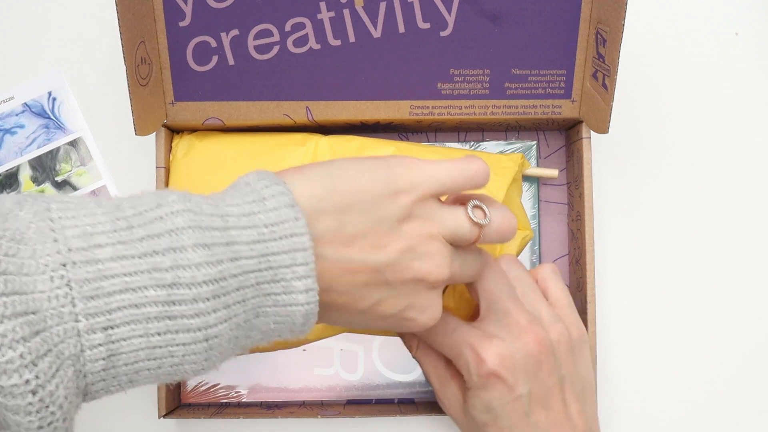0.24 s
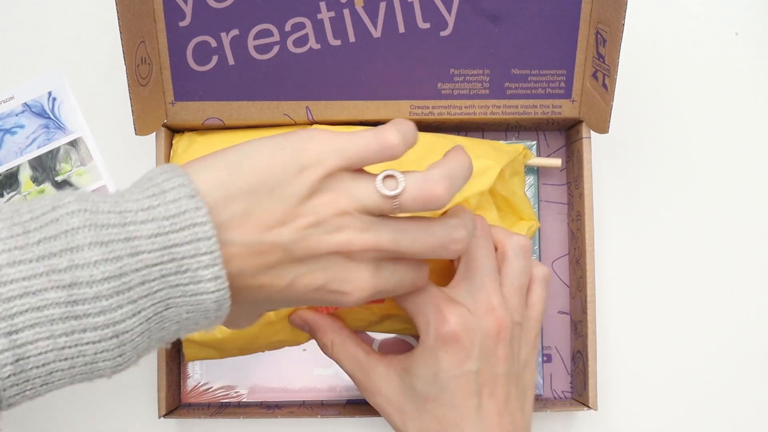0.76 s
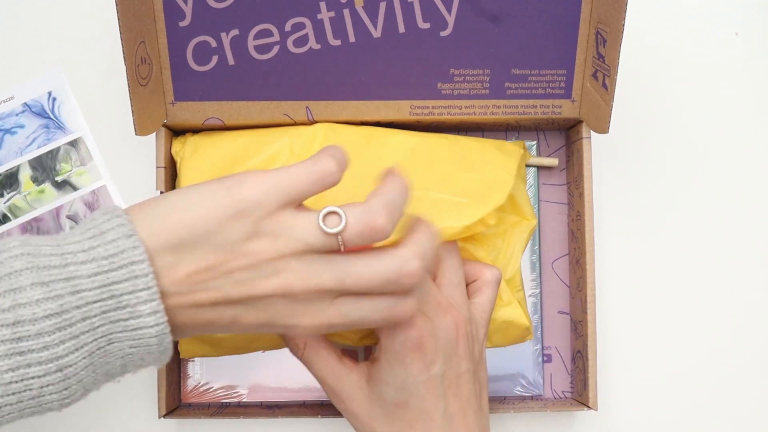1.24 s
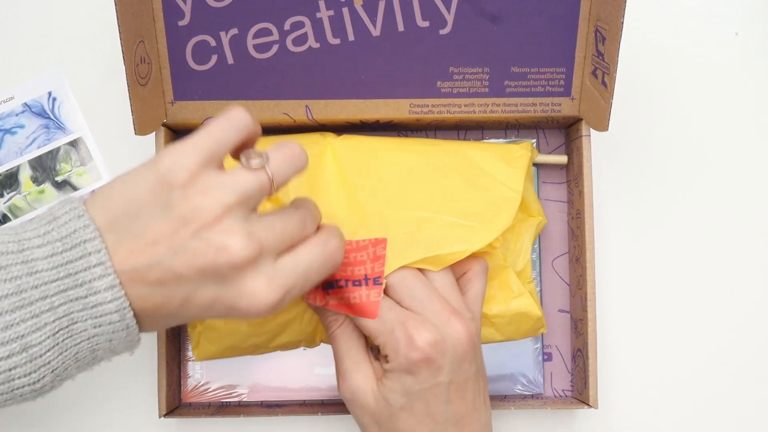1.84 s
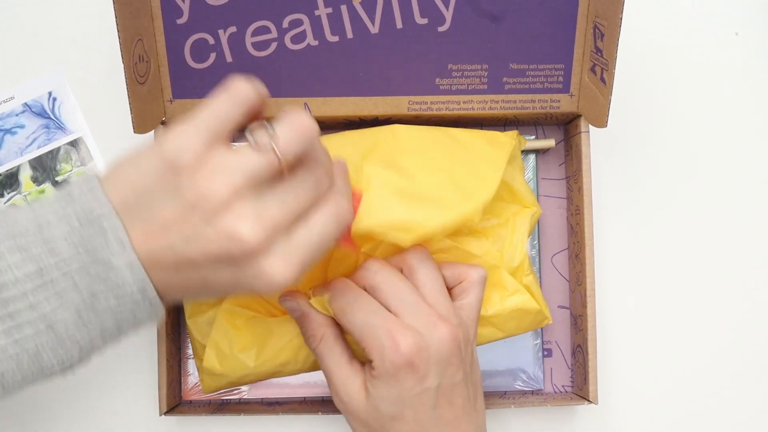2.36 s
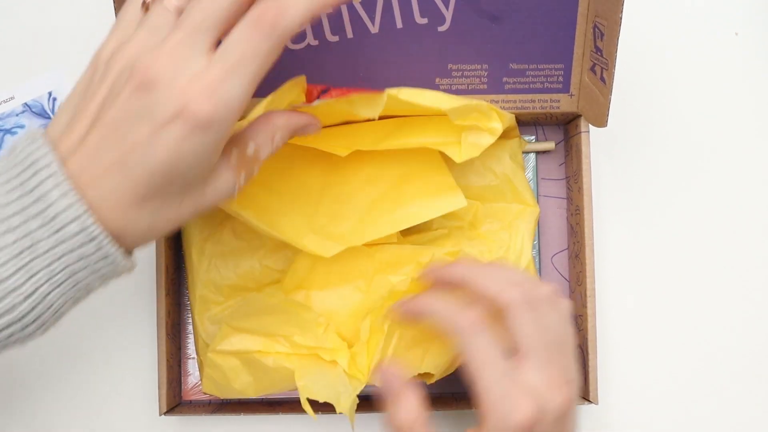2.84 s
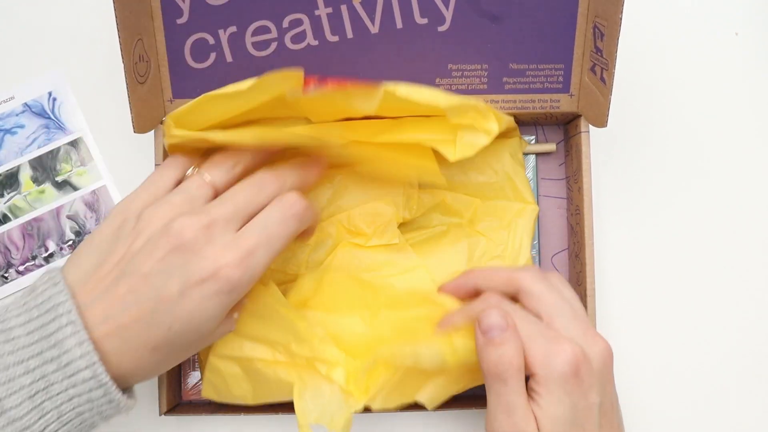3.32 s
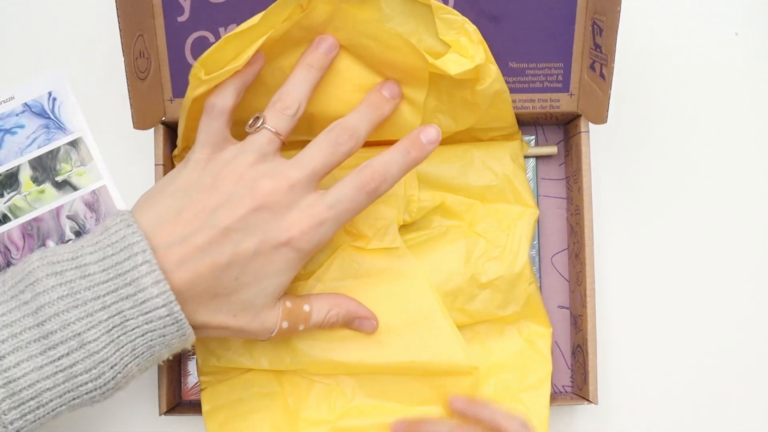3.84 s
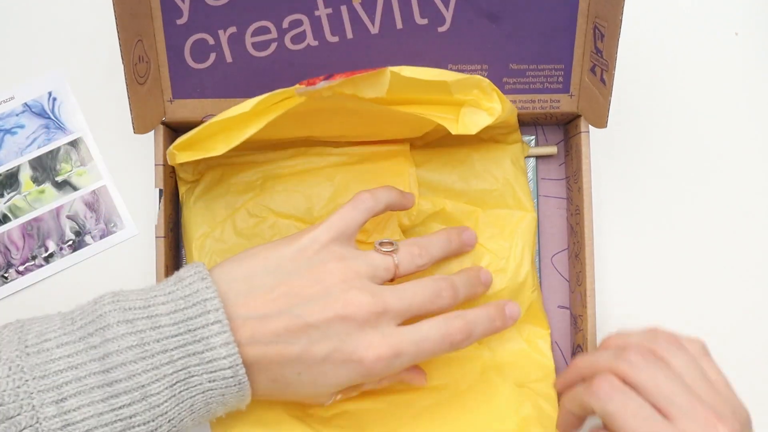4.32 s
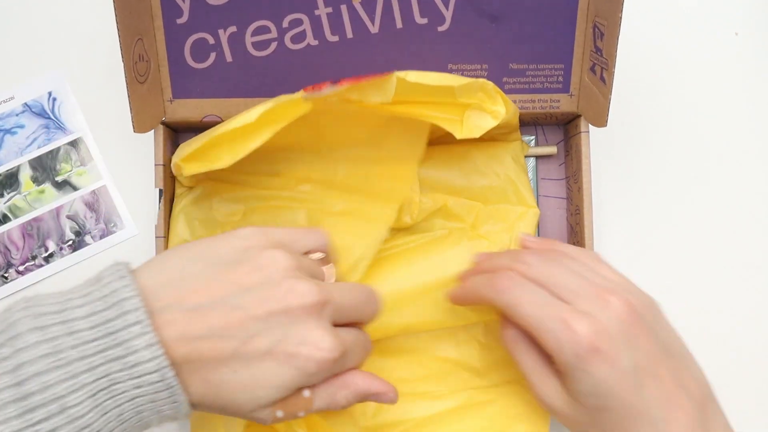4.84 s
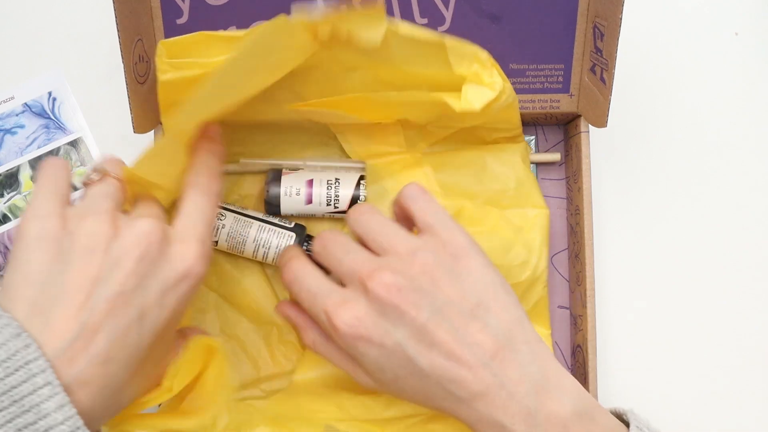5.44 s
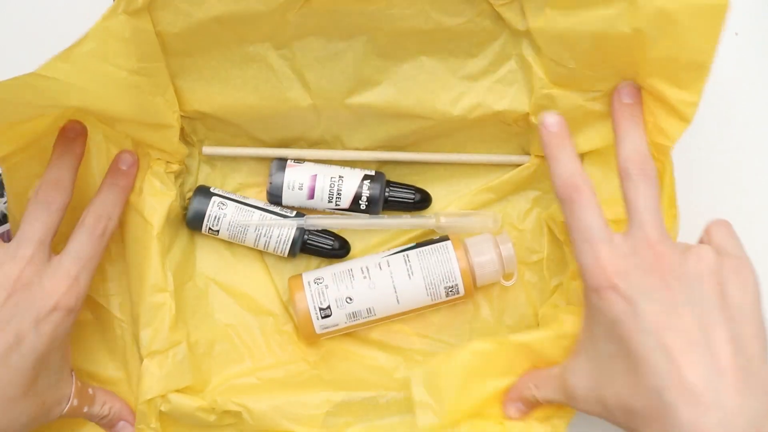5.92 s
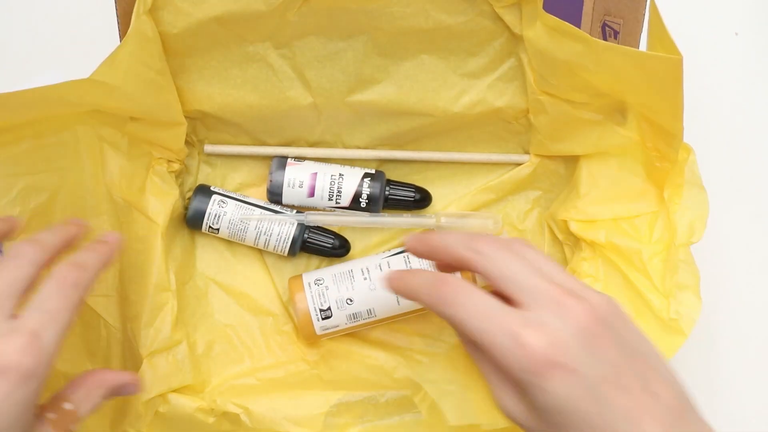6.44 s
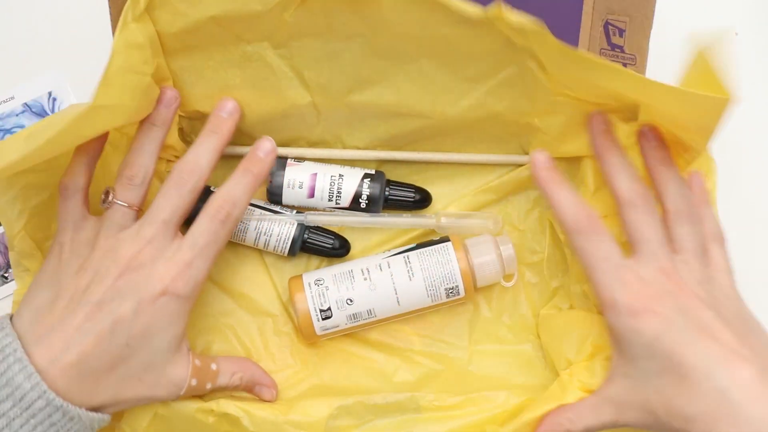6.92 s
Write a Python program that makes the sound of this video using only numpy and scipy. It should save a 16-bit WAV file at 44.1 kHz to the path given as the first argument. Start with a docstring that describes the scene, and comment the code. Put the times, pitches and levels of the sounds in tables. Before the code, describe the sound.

Dry, bright tissue paper heard very close in stereo, with little room echo. Short bursts of crinkling start strongly, shrink to small creases and picking, and nearly stop around three seconds. Hoarse palm sweeps and moderate rustles follow, then another hush. The longest, fullest unfolding comes after five seconds, a quiet gap follows, and the paper is pressed flat with a last sharp snap.

```python
"""Tissue paper rustles as hands peel a sticker off a parcel, fold the sheets open and smooth them down.
The rustle is thousands of tiny random clicks, the sheet's buckles, with louder snaps, crumples and soft flops.
The cardboard box rings along through its resonances, rumbles as filtered noise and takes a few soft bumps.
Sliding palms and pushed-out air are bands of noise. Two close microphones hear it in a small quiet room.
Levels in the tables are relative: they set the balance inside each sound."""
import sys
import numpy as np
from scipy import signal
from scipy.fft import rfft, irfft, next_fast_len
from scipy.io import wavfile
from scipy.ndimage import uniform_filter1d, map_coordinates

SR = 44100
rng = np.random.default_rng(int(sys.argv[2]) if len(sys.argv) > 2 else 0)


def transcribe(u):
    """Save the signal u as a 16-bit wav file named by the first command-line argument.

    u: samples, shape (n,) or (channels, n), limited to [-1, 1]; the rate is SR.
    q: integer samples, one column per channel.
    """
    v = np.clip(np.atleast_2d(u).T, -1, 1)
    q = np.round(v * 32767).astype(np.int16)
    wavfile.write(sys.argv[1], SR, q)


N = 316197  # length [samples]


def amp(db):
    """Turn decibels into a plain gain."""
    return 10 ** (np.asarray(db) / 20)


def unit(x):
    """Scale to an rms of 1."""
    return x / np.sqrt(np.mean(x ** 2) + 1e-20)


def along(points, hz):
    """Read a (frequency, value) curve on a log frequency axis, as hearing spaces pitch."""
    f, v = np.transpose(points)
    return np.interp(np.log(hz + 1), np.log(f), v)


def curves(rows):
    """One value per sample for each column after the time."""
    s, *columns = np.transpose(rows)
    return [np.interp(np.arange(N) / SR, s, column) for column in columns]


def wobble(rate):
    """A smooth random curve, with this many random points a second."""
    knots = rng.standard_normal(int(N * rate / SR) + 4)
    return map_coordinates(knots, [np.arange(N) * rate / SR])


def grid():
    """The frequencies on which the long filters are drawn."""
    return np.fft.rfftfreq(2 * next_fast_len((N + SR // 2) // 2), 1 / SR)


def filtered(x, response):
    """Pass x through a response given on the grid."""
    m = 2 * (len(response) - 1)
    return irfft(rfft(x, m) * response, m)[..., :N]


def causal(gain):
    """The minimum-phase response with this gain: it rings only after a hit."""
    cepstrum = irfft(np.log(np.maximum(gain, 1e-6)))
    half = len(cepstrum) // 2
    cepstrum[1:half] *= 2
    cepstrum[half + 1:] = 0
    return np.exp(rfft(cepstrum))


def noise(spectrum):
    """Stereo noise of rms 1 with this spectrum."""
    return unit(filtered(rng.standard_normal((2, N)), amp(along(spectrum, grid()))))


def add(track, s, sound):
    """Mix a sound into a track at time s."""
    part = track[..., max(round(s * SR), 0):][..., :sound.shape[-1]]
    part += sound[..., :part.shape[-1]]


# Tone colour of the paper: (frequency [Hz], level per Hz [dB])
PAPER_COLOUR = [(100, -47), (190, -34.5), (250, -16.5), (320, -10.5), (600, -6.5), (700, -6.5), (870, -4),
                (1250, -7.5), (2200, -9), (2900, -9.5), (5500, -8.5), (7300, -7.5), (9000, -9), (11800, -7),
                (13200, -15.5), (15600, -29.5)]


def paper_gain(hz):
    """How strongly the paper sounds at each frequency."""
    return amp(along(PAPER_COLOUR, hz))


def tinted(x, hz, q):
    """A short paper sound through one broad resonance, scaled to energy 1 per channel."""
    m = 2 * x.shape[-1]
    f = np.fft.rfftfreq(m, 1 / SR)
    resonance = 1 / (1 + (q * (f / hz - hz / (f + 1))) ** 2)
    y = irfft(rfft(x, m) * causal(paper_gain(f) * resonance), m)
    return y / np.sqrt(np.sum(y ** 2) / len(y))


def buckles(rate, spread_db):
    """Tiny buckles of the sheet as random impulses of rms 1, many small and a few large."""
    size = amp(spread_db * np.minimum(rng.standard_normal(N), 2.3))
    happens = rng.random(N) < rate / SR
    return unit(happens * size * rng.choice([-1, 1], N))


def facet(lead_ms, ring_s, scatter_s, scatter_db):
    """Stereo pop of one patch of paper: a click and brief flutter, scattered by the folds around it."""
    t = np.arange(1024) / SR
    flutter = rng.standard_normal(len(t)) * amp(-60 * t / ring_s)
    click_and_flutter = flutter / np.linalg.norm(flutter) + (t == 0)
    click_and_flutter = np.roll(click_and_flutter, 16)
    # each patch gets its own direction: a small time lead at one microphone
    lead = (lead_ms + 0.054 * rng.standard_normal()) / 1000 * np.array([[1], [-1]])
    shift = np.exp(1j * np.pi * np.fft.rfftfreq(len(t), 1 / SR) * lead)
    direct = irfft(rfft(click_and_flutter) * shift)
    scatter = rng.standard_normal((2, len(t))) * amp(-60 * t / scatter_s) * np.sqrt(t)
    pop = direct / np.linalg.norm(direct[0]) + amp(scatter_db) * scatter / np.linalg.norm(scatter[0])
    return pop / np.linalg.norm(pop[0])


# Where the paper moves: (time [s], lead at the left microphone [ms])
PLACE = [(0, 0.052), (.6, 0.072), (1.2, -0.015), (3.5, 0.0099), (5.8, -0.025), (6.3, 0.066), (7.17, 0.013)]


def sheet(pulses, count=3, size=3000):
    """A few patches buckle at a time; new ones replace them after every `size` samples."""
    out, lead_ms = np.zeros((2, N)), curves(PLACE)[0]
    patch = rng.integers(count, size=N)
    for start in range(0, N, size):
        block = slice(start, start + size)
        for k in range(count):
            own = (pulses[block] * (patch[block] == k))[None]
            pop = facet(lead_ms[start], ring_s=.003, scatter_s=.019, scatter_db=-1)
            add(out, start / SR, signal.fftconvolve(own, pop, axes=1))
    return out


RELEASE_S = 0.12  # the paper settles by 20 dB in this time [s] when a hand stops


def swell(s, rise_s, hold_s):
    """Gain of one hand movement: it gathers 20 dB in the rise time, holds, then the paper settles."""
    t = np.arange(N) / SR - s
    away = np.maximum(-t / max(rise_s, .005), (t - hold_s) / RELEASE_S)
    return np.exp(-np.log(10) * np.clip(away, 0, 10))


# Light rustle while the hands rest on the sheet and shift: (time [s], level [dB])
CONTACT = [(0, -49.5), (0.3, -30.5), (0.66, -42.5), (1.2, -44.5), (1.75, -47), (2.35, -46.5), (2.6, -55),
           (2.88, -55.5), (3.14, -74.5), (3.24, -54), (3.9, -45.5), (4.06, -52.5), (4.22, -57), (4.49, -69),
           (4.72, -41), (6.03, -33.5), (6.22, -47.5), (6.5, -61.5), (6.66, -64), (6.85, -39)]
CONTACT_BODY_DB, CONTACT_SIZZLE_DB = -5, 0.5  # its low body and its sizzle, relative to it [dB]
# Tugs, lifts and sweeps, from picking at the sticker to pressing the sheets flat:
# (time of full speed [s], rise [s], hold [s], rustle level [dB],
#  low body relative to rustle [dB], sizzle relative to rustle [dB])
MOVES = [ (0.1, 0.18, 0.056, -32.5, 3, 3), (0.386, 0.035, 0.099, -28.5, 3.5, 3),
         (0.836, 0.058, 0.18, -38.5, -3, 1.5), (1.1, 0.12, 0.046, -34, -6, 1.5),
         (1.237, 0.06, 0.052, -28.5, -6, -1), (1.318, 0.069, 0.023, -40, 0, 4),
         (1.437, 0.046, 0.017, -45, -3, -3), (1.591, 0.19, 0.071, -38.5, -2.5, 0.5),
         (1.927, 0.051, 0.043, -48, 5, 8.5), (2.102, 0.086, 0.035, -32.5, -16, -8),
         (2.134, 0.059, 0.0075, -32, 5, 0), (2.32, 0.036, 0.019, -35, -5, -1),
         (2.388, 0.037, 0.027, -34, -5.5, 7), (2.801, 0.32, 0.015, -43.5, -4.5, -0.5),
         (3.172, 0.0081, 0.033, -48.5, -14, -12), (3.256, 0.043, 0.1, -38, 0.5, 3.5),
         (3.467, 0.06, 0.025, -44.5, 7, 5.5), (3.74, 0.28, 0.046, -37.5, -0.5, 0),
         (3.828, 0.026, 0.015, -34, -3.5, 3), (3.925, 0.083, 0.032, -36, -6.5, 4),
         (4.368, 0.005, 0.024, -53, -11, -3), (4.526, 0.045, 0.02, -50, -12, 10.5),
         (4.643, 0.11, 0.017, -37.5, -9, 4), (4.761, 0.033, 0.12, -34, -18, 3.5),
         (4.911, 0.21, 0.15, -31, -3, 1.5), (5.198, 0.056, 0.093, -28.5, -2, 2),
         (5.51, 0.32, 0.27, -28, -2.5, 1.8), (5.785, 0.14, 0.079, -22, -4.5, 3),
         (5.91, 0.25, 0.043, -24.5, -2.5, 1.5), (5.997, 0.05, 0.015, -28.5, -3, -2),
         (6.055, 0.067, 0.027, -41, -19, 6), (6.176, 0.028, 0.043, -55, 9, 4),
         (6.29, 0.11, 0.032, -47, -18, 1), (6.697, 0.099, 0.02, -51.5, -5, -6),
         (6.838, 0.12, 0.4, -28.7, -2, 3.8), (7.158, 0.078, 0.03, -23.5, -1.5, 0)]


def handling():
    """Add the power of resting contact and all movements: rustle dB, with relative body and sizzle."""
    power = (amp(curves(CONTACT)[0]) * amp([[0], [CONTACT_BODY_DB], [CONTACT_SIZZLE_DB]])) ** 2
    for s, rise_s, hold_s, db, body_db, sizzle_db in MOVES:
        levels = amp([[db], [db + body_db], [db + sizzle_db]])
        power += levels ** 2 * swell(s, rise_s, hold_s) ** 2
    rustle_db, body_db, sizzle_db = 10 * np.log10(power)
    return rustle_db, body_db - rustle_db, sizzle_db - rustle_db


def rustle(paper, rustle_db, body_db, sizzle_db):
    """Faster handling sets off more and louder buckles, and their clumps merge into a more even rush."""
    haste_db = np.clip(rustle_db, -58, -20) + 35
    rate = 5000 * amp(.65 * haste_db)  # buckles per second
    clumping = np.clip(1 - .045 * haste_db, .4, 1.15)
    bunching = np.minimum(.5 * wobble(50) + 1.9 * wobble(260), 3)
    clumps = unit(amp(clumping * bunching))
    even_buckles = unit(buckles(rate, spread_db=4.6) / np.sqrt(rate))
    crackle = sheet(even_buckles * clumps)
    # large loose flaps give body and a smooth sliding rush; tight small creases give a grainy sizzle
    hz = grid()
    low, high = 1 / (1 + (hz / 1200) ** 4), 1 - 1 / (1 + (hz / 4500) ** 4)
    smooth = unit(crackle + amp(-4) * rng.standard_normal((2, N)))
    grainy = unit(crackle + amp(-13) * rng.standard_normal((2, N)))
    parts = [(smooth, low, body_db - 5.5), (smooth, 1 - low - high, 0), (grainy, high, sizzle_db - 2.5)]
    colour = causal(paper)
    sound = np.zeros((2, N))
    for x, share, db in parts:
        band = colour * share / np.sqrt(np.mean((paper * share) ** 2))
        sound += amp(rustle_db + db) * filtered(x, band)
    # the tiniest creases tick on their own and stand out most when the hands move slowly
    tick_colour = causal(unit(paper / (1 + (6000 / (hz + 1)) ** 4)))
    ticks = filtered(sheet(buckles(70, spread_db=5), count=1), tick_colour)
    return sound + ticks * amp(-58.5 + 0.8 * (rustle_db + sizzle_db + 44.0))


def shifting(x, depth_db, size=512):
    """Cavities between the folds open and close, so broad patches of colour come and go."""
    z = signal.stft(x, nperseg=size)[2]
    across_pitch = uniform_filter1d(rng.standard_normal(z.shape[1:]), size=6, axis=0)
    field = uniform_filter1d(across_pitch, size=12, axis=1)
    return signal.istft(z * amp(depth_db * unit(field)), nperseg=size)[1][:, :N]


# How firmly the hands press the parcel against the box: (time [s], share [0-1])
PRESS = [(0, 0.7), (.45, 1), (1.1, 1), (1.3, 0.82), (2.2, 0.42), (2.6, 0.56), (3.3, 0.46), (3.85, 0.02),
         (5.2, 0.35), (5.65, 0.08), (6.7, 0.47), (7.17, 0.18)]


def pressing():
    """Firmness of the hands at every sample."""
    return curves(PRESS)[0]


# Resonances of the cardboard box: (frequency [Hz], width [Hz], level [dB])
BOX_RESONANCES = [(373, 9.5, -9.5), (560, 160, -13), (886, 48, 1.5), (1125, 23, -5), (1390, 50, -4.5),
                  (1900, 88, -6.5), (2230, 42, -0.5), (3200, 56, -15), (3760, 900, -12.5)]


def box(x):
    """The cardboard box rings along with a sound, most strongly near its resonances."""
    hz = grid()
    response = np.zeros(len(hz), complex)
    for centre, width, db in BOX_RESONANCES:
        damping = 1j * hz * width
        response += amp(db) * damping / (centre * centre - hz * hz + damping)
    return filtered(x, response)


# Tone colour of the box rumble: (frequency [Hz], level per Hz [dB])
RUMBLE_COLOUR = [(40, -46), (75, 1), (115, -1), (180, -1.5), (250, -0.5), (600, -78)]
# level [dB], growth [dB per dB of rustle], loss under the firmest press [dB]
RUMBLE_DB, RUMBLE_GROWS, PRESS_DAMPS_DB = -24.5, 0.79, 8


def rumble(rustle_db, press):
    """The box rumbles with the handling, as low noise that a firm press makes quieter."""
    level_db = RUMBLE_DB + RUMBLE_GROWS * rustle_db - PRESS_DAMPS_DB * press
    return amp(level_db) * noise(RUMBLE_COLOUR)


# Tone colour of the quiet room: (frequency [Hz], level per Hz [dB])
HUSH_COLOUR = [(25, 0), (50, 1), (110, 4.5), (300, 0), (1000, -5), (5000, -17), (15000, -37)]


def hush():
    """The quiet room's background is a faint steady noise, mostly low."""
    return amp(-58.5) * noise(HUSH_COLOUR)


# How long the room rings: (frequency [Hz], time to fall by 60 dB [s])
ROOM_DECAY = [(150, 0.31), (1000, 0.13), (5000, 0.064), (14000, 0.019)]


def room(x):
    """The room scatters sound into a short tail of fading noise, its treble dying first."""
    hz, t, z = signal.stft(rng.standard_normal((2, SR // 3)), SR, nperseg=256)
    fade = amp(-60 * t / along(ROOM_DECAY, hz)[:, None])
    tail = signal.istft(z * fade, SR, nperseg=256)[1]
    late = np.pad(x, ((0, 0), (SR // 200, 0)))  # the tail starts 5 ms later
    return signal.fftconvolve(late, tail / np.linalg.norm(tail[0]), axes=1)[:, :N]


# Single creases popping through:
# (time [s], click level [dB], click pitch [Hz], flexing level [dB], flexing pitch [Hz])
SNAPS = [(0.0318, -26, 7500, -26, 950), (0.0695, -20, 8400, -23, 2110), (0.1034, -16, 8700, -15, 1160),
         (0.1174, -23, 8600, -17, 860), (0.1545, -14, 8900, -13, 1340), (0.2483, -28, 7100, -19, 900),
         (0.3003, -18, 7500, -30, 2710), (0.3124, -22, 7500, -24, 950), (0.3982, -13, 8000, -8, 900),
         (0.4084, -14, 8600, -16, 2500), (0.4117, -10, 7800, -3, 2200), (0.4147, -12, 8300, -3, 2110),
         (0.4177, -18, 8000, -7, 2240), (0.4279, -16, 7900, -9, 2070), (0.4382, -12, 7800, -7, 990),
         (0.4649, -13, 7700, -8, 2330), (0.4724, -17, 8100, -11, 1030), (0.5134, -18, 5800, -14, 2580),
         (0.6748, -26, 6500, -22, 900), (1.1094, -23, 7300, -21, 2450), (1.214, -22, 8000, -18, 2240),
         (1.2385, -19, 8300, -12, 2150), (1.2484, -20, 8600, -17, 2200), (1.2795, -18, 8800, -11, 2370),
         (1.3474, -23, 7600, -24, 2840), (1.6195, -24, 8600, -23, 2410), (1.667, -32, 8000, -23, 730),
         (1.7992, -28, 8800, -30, 3450), (1.8252, -28, 6300, -30, 3450), (1.8383, -29, 6400, -37, 1080),
         (1.9029, -23, 10500, -36, 820), (1.914, -29, 10200, -34, 2150), (2.1605, -15, 8800, -12, 2110),
         (2.168, -17, 8900, -12, 900), (2.1764, -18, 8800, -16, 860), (2.2383, -31, 7200, -38, 1890),
         (2.4204, -18, 7500, -15, 1980), (2.605, -40, 8600, -41, 2070), (2.6257, -39, 9100, -46, 1770),
         (2.7198, -35, 6900, -42, 1340), (2.8224, -33, 7100, -38, 900), (2.9736, -46, 8100, -50, 1030),
         (3.024, -40, 8100, -49, 1510), (3.0624, -49, 8100, -59, 690), (3.2258, -27, 6000, -34, 1850),
         (3.2582, -25, 7800, -22, 2110), (3.3184, -23, 8000, -34, 3960), (3.474, -37, 9100, -26, 860),
         (3.5598, -24, 7400, -25, 2840), (3.6508, -29, 8700, -29, 1980), (3.8424, -23, 8100, -22, 1850),
         (3.9234, -21, 8500, -25, 2800), (3.9435, -22, 8600, -23, 2330), (3.9683, -26, 8500, -22, 1890),
         (4.0205, -33, 9100, -26, 2070), (4.1414, -37, 9300, -42, 1980), (4.1588, -40, 8600, -48, 1460),
         (4.2612, -42, 7100, -46, 2800), (4.3225, -46, 7000, -46, 3060), (4.3655, -41, 7700, -49, 1380),
         (4.3786, -43, 9200, -41, 1720), (4.391, -44, 6800, -41, 2630), (4.4536, -42, 7900, -41, 1380),
         (4.4606, -39, 8800, -38, 1460), (4.506, -35, 10200, -38, 1940), (4.5128, -33, 9900, -35, 2150),
         (4.5398, -30, 8700, -33, 1850), (4.5903, -32, 9700, -35, 1720), (4.6144, -37, 8000, -30, 3140),
         (4.6236, -24, 9900, -29, 2150), (4.7765, -19, 7600, -19, 3700), (4.872, -24, 8200, -20, 2760),
         (4.9755, -19, 7100, -18, 1770), (4.9905, -16, 7400, -19, 1770), (5.1642, -22, 8400, -28, 2500),
         (5.2864, -15, 8000, -16, 3230), (5.557, -15, 9000, -25, 1680), (5.715, -15, 7600, -12, 950),
         (5.801, -12, 8300, -11, 2150), (5.8345, -11, 8000, -9, 3230), (5.8495, -16, 7600, -8, 2070),
         (6.1912, -28, 10700, -33, 690), (6.354, -33, 8900, -45, 1770), (6.4085, -38, 8900, -48, 1550),
         (6.4504, -41, 8200, -42, 2710), (6.4682, -43, 6500, -45, 1850), (6.4998, -38, 11800, -51, 3920),
         (6.551, -41, 9300, -43, 3010), (6.569, -41, 7900, -46, 2020), (6.6677, -40, 8200, -32, 1030),
         (6.6928, -39, 9100, -47, 1510), (6.7343, -32, 6500, -39, 1640), (6.7455, -24, 6400, -26, 3700),
         (7.166, -9, 8200, -12, 860)]
CLICK_Q, FLEX_Q = 1, 1.53  # how narrowly a crease clicks and the sheet around it flexes


def snaps():
    """A crease pops through with a click of its own brightness; the sheet around it flexes briefly."""
    out = np.zeros((2, N))
    for s, click_db, click_hz, flex_db, flex_hz in SNAPS:
        click = tinted(facet(0, ring_s=.003, scatter_s=.013, scatter_db=-6), click_hz, CLICK_Q)
        flex = tinted(facet(0, ring_s=.008, scatter_s=.016, scatter_db=-7), flex_hz, FLEX_Q)
        add(out, s, amp(click_db + 10) * click + amp(flex_db + 8.5) * flex)
    return out


# Folds giving way in a run of buckles:
# (time [s], peak level [dB], time to fall by 60 dB [s], pitch of the fold [Hz])
CRUMPLES = [(0.092, -9, 0.075, 2300), (0.15, -14, 0.28, 2440), (0.242, -33, 0.039, 2270),
            (0.383, -9, 0.1, 3070), (0.409, -2, 0.045, 2000), (0.439, -8, 0.04, 2240),
            (0.4653, -11, 0.055, 2230), (0.5053, -13, 0.088, 2120), (0.672, -17.5, 0.04, 2300),
            (0.968, -26, 0.04, 2250), (1.207, -17, 0.12, 2170), (1.2276, -13, 0.021, 2200),
            (1.2416, -14, 0.16, 2120), (1.26, -18, 0.046, 3400), (1.271, -11.5, 0.11, 2160),
            (1.617, -19, 0.081, 2230), (1.793, -30.5, 0.39, 3620), (2.071, -25, 0.087, 2270),
            (2.0867, -20, 0.54, 2140), (2.141, -15, 0.093, 1820), (2.156, -16, 0.11, 2100),
            (2.166, -24, 0.035, 1400), (2.205, -33.5, 0.3, 1950), (2.308, -29, 0.13, 2750),
            (2.379, -7.5, 0.23, 3460), (2.395, -17, 0.38, 2140), (2.418, -14, 0.062, 2030),
            (3.077, -41, 0.067, 2500), (3.158, -30, 0.15, 2980), (3.229, -17, 0.091, 1900),
            (3.5591, -18.5, 0.02, 2830), (3.8347, -15.5, 0.22, 1900), (3.918, -21.5, 0.48, 1750),
            (4.3664, -36.5, 0.085, 2400), (4.454, -35, 0.051, 3740), (4.508, -29.5, 0.084, 1880),
            (4.7765, -14.5, 0.11, 2750), (4.972, -11, 0.16, 1850), (5.353, -22, 0.23, 2590),
            (5.504, -12.5, 0.25, 2060), (5.713, -10, 0.12, 1900), (5.787, -22, 0.095, 3120),
            (5.833, -7, 0.09, 2000), (6.553, -37.5, 0.04, 3000), (6.6685, -47, 0.08, 1590),
            (6.7322, -26.5, 0.14, 2000), (6.746, -24.5, 0.14, 4540)]


def crumples(paper):
    """A fold gives way suddenly; its buckles ring at the fold's own pitch and die out."""
    runs, t = np.zeros(N), np.arange(SR // 3) / SR
    pulses = buckles(8000, spread_db=-1.5)
    for s, db, life, hz in CRUMPLES:
        fading = amp(db - 18.5 - 60 * t / max(life, .01))
        run = pulses[round(s * SR):][:len(t)] * fading
        ringing = signal.lfilter(*signal.iirpeak(hz, 3.5, fs=SR), run)
        add(runs, s, run + 9.2 * ringing)
    return filtered(sheet(runs), causal(unit(paper)))


# Loose pockets of the sheet flopping over: (time [s], level [dB], hollow pitch [Hz])
FLOPS = [(.15, -32, 430), (.85, -47, 433), (.965, -34.5, 550), (1.122, -38.5, 420), (1.262, -31, 340),
         (1.342, -36, 306), (1.445, -34, 720), (1.657, -36, 520), (1.97, -38, 513), (3.835, -39, 480),
         (4.975, -32.5, 450), (5.225, -39, 230), (5.285, -34, 217), (5.365, -31, 328), (6.2, -45.5, 550),
         (6.705, -47, 850), (6.745, -37, 830), (7.135, -27.5, 200)]
FLOP_RISE_S, FLOP_T60_S, FLOP_Q = 0.004, 0.1, 3.5  # onset [s], fall by 60 dB [s], narrowness


def flops():
    """A loose pocket of paper flops over: a short noise burst through a resonance, soft and hollow."""
    out, t = np.zeros(N), np.arange(SR // 8) / SR
    shape = (1 - np.exp(-t / FLOP_RISE_S)) * amp(-60 * t / FLOP_T60_S)
    for s, db, hz in FLOPS:
        burst = shape * rng.standard_normal((1, len(t)))
        add(out, s, amp(db) * np.linalg.norm(shape) * tinted(burst, hz, FLOP_Q)[0])
    return out


# Air pushed out from under the sheet: (time of full level [s], hold [s], level [dB])
PUFFS = [(0.401, 0.068, -69), (1.22, 0.04, -66), (2.18, 0.02, -58), (3.657, 0.05, -67), (4.99, 0.026, -68),
         (5.64, 0.2, -55), (6.225, 0.04, -52), (6.766, 0.15, -48), (7.04, 0.16, -56)]
PUFF_RISE_S = 0.11  # time to gather 20 dB [s]
# Tone colour of the moving air: (frequency [Hz], level per Hz [dB])
AIR_COLOUR = [(20, -36), (31, -18), (39, 2), (46, 0), (55, -6), (80, -13), (300, -60)]


def puffs():
    """The sheet wafts air, heard as swells of very low noise."""
    level = sum(amp(db) * swell(s, PUFF_RISE_S, hold_s) for s, hold_s, db in PUFFS)
    return level * noise(AIR_COLOUR)


# Fingers bumping the box:
# (time [s], wall ring level [dB], thud level [dB], pitch of the struck spot [ratio])
BUMPS = [(.44, -23, -49, 1), (2.156, -11, -45, 1.02), (2.166, -11, -30, 0.99), (2.175, -23, -46, 1.1),
         (2.2145, -30, -49, 0.87), (2.2435, -18.5, -46, 1.04), (2.272, -24.5, -43, 1),
         (6.189, -34, -70, 0.75), (6.668, -34.5, -69, 1.32)]
# Knocked wall of the box, before the pitch ratio: (frequency [Hz], time to fall by 60 dB [s], level [dB])
WALL_MODES = [(866, 0.037, -2.5), (1180, 0.031, -30), (1530, 0.025, -17), (1895, 0.051, -10.5),
              (2230, 0.025, -19)]
# Box on the table, lowest pitch of each tone: (frequency [Hz], time to fall by 60 dB [s], level [dB])
THUD_MODES = [(50, 0.15, -12), (74, 0.077, 2.5), (116, 0.062, -4)]


def bumps():
    """A fingertip knocks the box wall, which rings as fading tones, and the box thuds on the table."""
    out, t = np.zeros(N), np.arange(SR // 4) / SR
    soft_onset = 1 - np.exp(-t / 0.0036)
    for s, ring_db, thud_db, pitch in BUMPS:
        wall, thud = np.zeros(len(t)), np.zeros(len(t))
        for hz, t60, db in WALL_MODES:
            wall += amp(db - 60 * t / t60) * np.sin(2 * np.pi * hz * pitch * t)
        for hz, t60, db in THUD_MODES:
            thud_hz = hz * rng.uniform(1.0, 1.13)
            thud += amp(db - 60 * t / t60) * np.sin(2 * np.pi * thud_hz * t)
        add(out, s, (amp(ring_db + 3.0) * wall + amp(thud_db) * thud) * soft_onset)
    return out


# A palm sliding over the sheet:
# (time of full speed [s], rise [s], hold [s], level [dB], centre pitch [Hz])
STROKES = [(3.729, 0.15, 0.032, -30, 2600), (3.93, 0.097, 0.084, -34, 1918), (4.54, 0.045, 0.16, -36, 1837),
           (4.776, 0.07, 0.11, -31, 2222), (4.972, 0.06, 0.021, -29, 1827), (5.82, 0.14, 0.17, -25.5, 1896),
           (6.31, 0.042, 0.012, -41, 1620), (6.826, 0.14, 0.29, -30, 1890)]


def strokes():
    """Skin dragging over the sheet makes a hoarse band of noise whose pitch glides between strokes."""
    level = sum(amp(db - 8) * swell(s, rise_s, hold_s) for s, rise_s, hold_s, db, _ in STROKES)
    hz = curves(STROKES)[-1]
    grip = rng.standard_normal((2, N)) + 1j * rng.standard_normal((2, N))
    shared = grip + grip[::-1] * 0.52  # each side hears part of the other
    grip = signal.sosfilt(signal.butter(2, 260, fs=SR, output="sos"), shared)
    # slow noise is carried up to the centre pitch
    return level * unit(np.real(grip * np.exp(2j * np.pi * np.cumsum(hz) / SR)))


# Stereo width: (frequency [Hz], gain of the left-right difference [dB])
WIDTH = [(25, -18), (60, -24), (130, -6), (280, -4), (700, -6), (1300, -1), (1950, 0), (3000, 2), (8000, 0),
         (13000, 2)]
# Balance of the two sides: (frequency [Hz], left minus right [dB])
TILT = [(130, -0.1), (500, -0.5), (1000, -0.6), (2000, -1.6), (4000, -1), (12000, 0.2)]


def microphones(left, right):
    """Two closely spaced microphones hear the bass nearly alike, each with a slight tone of its own."""
    mid = (left + right) / 2
    side = filtered((left - right) / 2, amp(along(WIDTH, grid())))
    lean_db = along(TILT, grid()) / 2
    return np.array([filtered(mid + side, amp(lean_db)), filtered(mid - side, amp(-lean_db))])


def scene():
    """Mix paper, box, hands and room at the microphones."""
    paper, press = paper_gain(grid()), pressing()
    rustle_db, body_db, sizzle_db = handling()
    moving_paper = shifting(rustle(paper, rustle_db, body_db, sizzle_db), depth_db=1.1)
    tissue = moving_paper + snaps() + crumples(paper)
    box_ring = amp(5.5) * press * box(tissue.mean(axis=0))
    near = tissue + box_ring + strokes() + bumps() + flops()
    walls = amp(-13) * room(near)
    bass = puffs() + rumble(rustle_db, press)
    left, right = near + walls + bass + hush()
    return amp(-1.43) * microphones(left, right)


TOP_HZ = 15800  # band limit [Hz]


def record(dry):
    """Nothing is kept above the band limit."""
    return filtered(dry, grid() < TOP_HZ)


dry = scene()
out = record(dry)
transcribe(out)
```